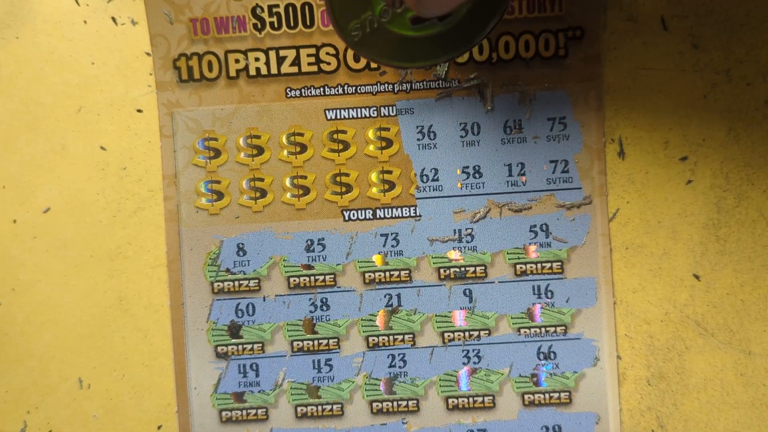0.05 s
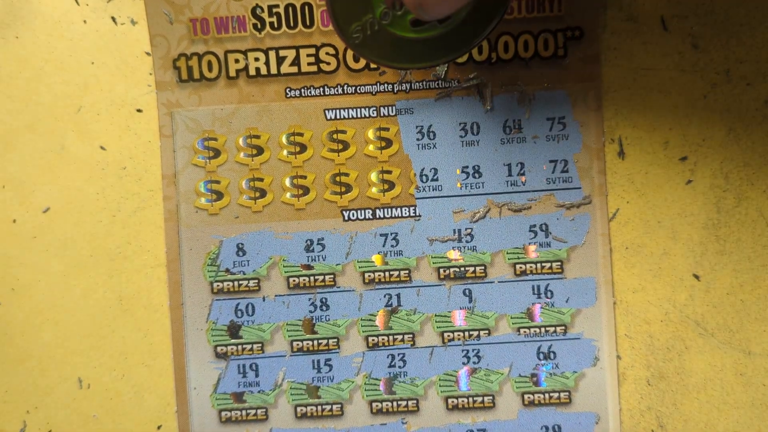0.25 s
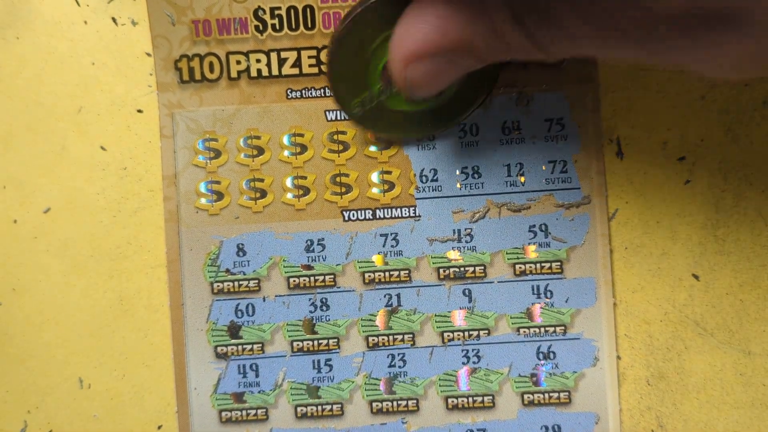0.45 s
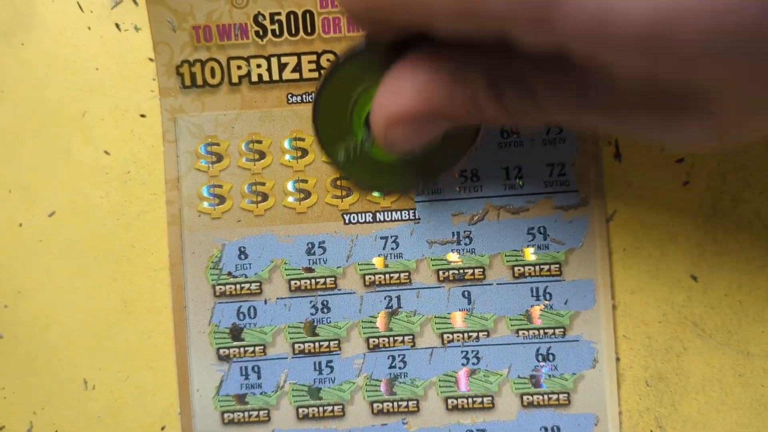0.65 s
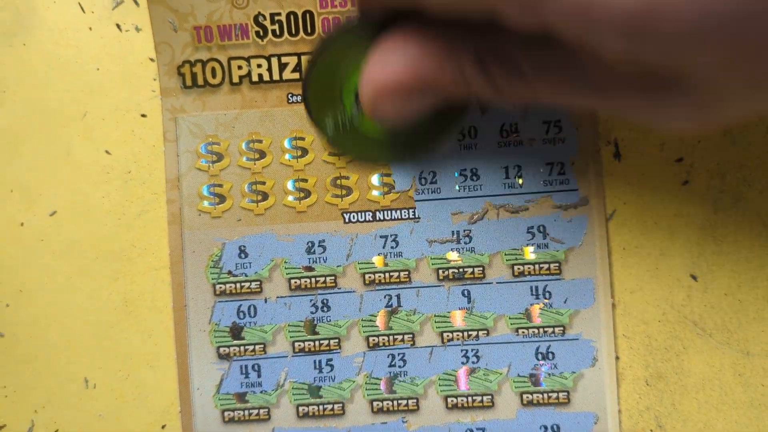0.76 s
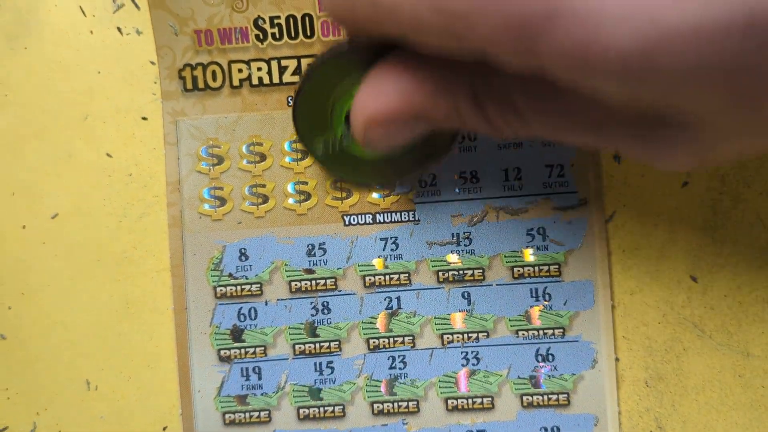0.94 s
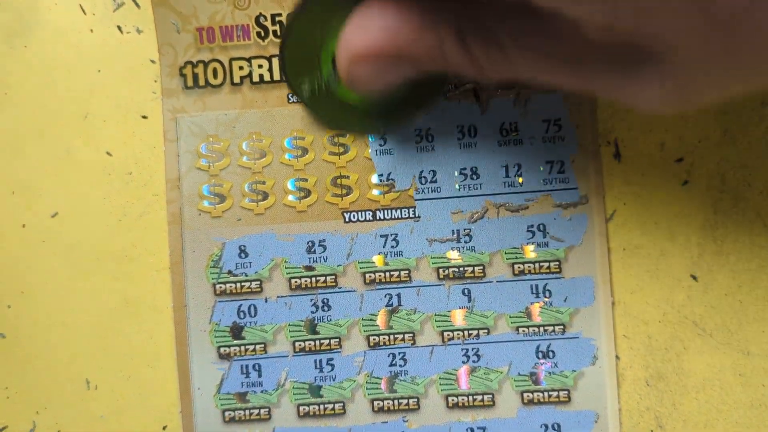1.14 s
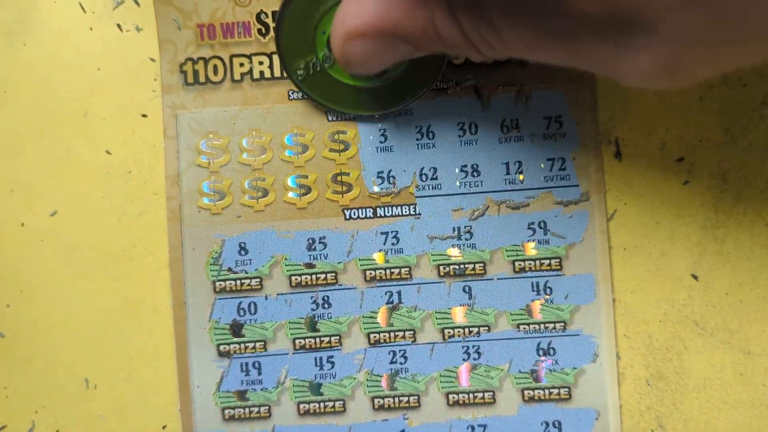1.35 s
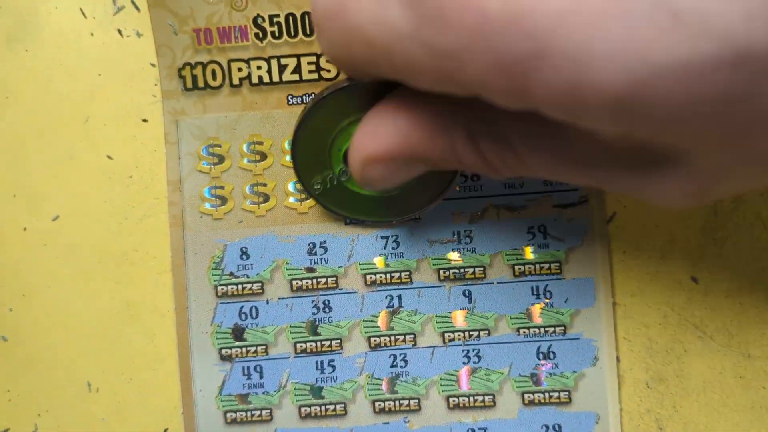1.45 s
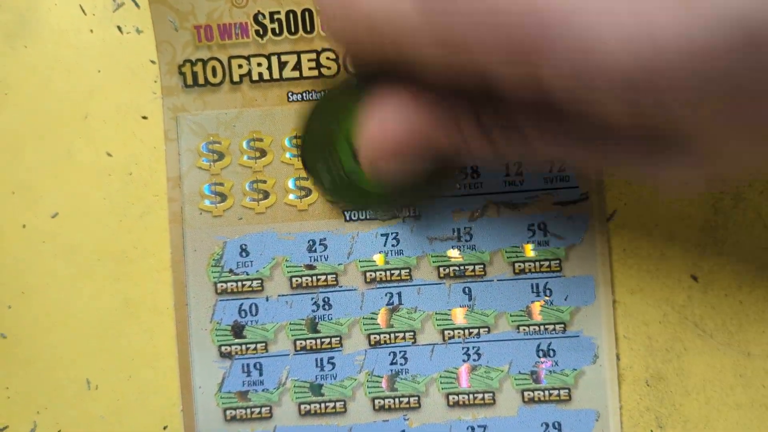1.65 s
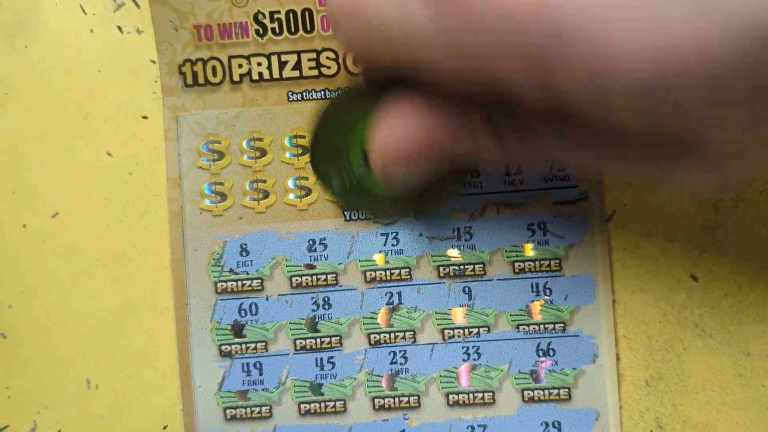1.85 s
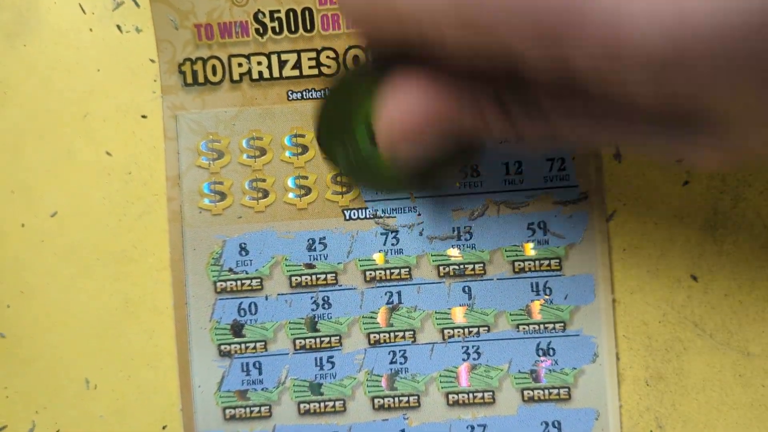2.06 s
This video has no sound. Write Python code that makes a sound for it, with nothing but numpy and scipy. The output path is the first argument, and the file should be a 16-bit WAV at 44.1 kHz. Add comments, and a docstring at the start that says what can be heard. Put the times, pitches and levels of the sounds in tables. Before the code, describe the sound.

Rapid dry scratching of a hard plastic rim on a paper ticket, with small table thuds

```python
"""Scratching a paper ticket

On a table indoors, close to the left microphone, a plastic disc scrapes the coating off a paper ticket.
It touches down, slides lightly, then rubs to and fro about seven times a second. Tiny grains of coating
break and ring the disc; the table judders late in each stroke and thuds where the disc bumps it, and the
rim ticks as it lands again. Short echoes, rumble, a wavering hum and faint hiss lie around it."""
import sys
import numpy as np
from scipy import signal
from scipy.fft import rfft, irfft
from scipy.io import wavfile

SR = 44100
rng = np.random.default_rng(int(sys.argv[2]) if len(sys.argv) > 2 else 0)


def int16_out(signal):
    """Quantize to a 16-bit WAV file."""
    q = np.round(np.clip(np.atleast_2d(signal).T, -1, 1) * 32767)
    wavfile.write(sys.argv[1], SR, q.astype(np.int16))


N = 92565


def amp(db):
    """Turns decibels into a pressure ratio."""
    return 10 ** (np.asarray(db) / 20)


def unit(x):
    """Scales to rms 1."""
    return x / np.sqrt(np.mean(x ** 2) + 1e-20)


def read(points, hz):
    """Reads a table on a log-frequency axis."""
    f, value = np.transpose(points)
    return np.interp(np.log(hz + 1), np.log(f + 1), value)


def through(x, response):
    """Sends a signal through an impulse response."""
    return signal.fftconvolve(x, response)[:N]


def shaped(x, gain):
    """Filters x by a gain that is a function of frequency."""
    hz = np.fft.rfftfreq(2 * N, 1 / SR)
    return irfft(rfft(x, 2 * N) * gain(hz))[:N]


def wander(hz):
    """Smooth random signal of rms 1, mostly slower than the given rate."""
    return unit(shaped(rng.standard_normal(N), lambda f: 1 / (1 + (f / hz) ** 4)))


MIN_WIDTH_HZ = 70  # narrower resonances are widened to this


def body(colour, modes=(), size=4096):
    """Minimum-phase impulse response of a broad colour with resonances on it."""
    hz = np.fft.rfftfreq(size, 1 / SR)
    db = read(colour, hz)
    for f, width, lift in modes:
        db = db + lift / (1 + (2 * (hz - f) / max(width, MIN_WIDTH_HZ)) ** 2)
    log_gain = np.log(amp(np.r_[db, db[-2:0:-1]]))
    # the Hilbert transform gives the phase that makes the response causal
    return np.fft.ifft(np.exp(np.conj(signal.hilbert(log_gain)))).real


def arch(start, length, peak, power):
    """Strength over one stroke: zero at both ends, 1 at the peak, as the rim speeds up and slows."""
    u = (np.arange(N) / SR - start) / length
    phase = np.interp(u, [0, np.clip(peak, 0.02, 0.98), 1], [0, 0.5, 1])
    return abs(np.sin(np.pi * phase)) ** power


def grains(per_s, spread_db):
    """Random snaps of uneven size and either sign, scaled to rms 1."""
    size = amp(spread_db * np.minimum(rng.exponential(1, N), 3.7))
    return unit(size * rng.choice([-1, 1], N) * (rng.random(N) < per_s / SR))


def strike(response, contact_ms):
    """One blow of peak 1; a longer contact spreads the force and dulls it."""
    u = np.arange(400) * 1000 / SR / max(contact_ms, 0.01)
    force = u ** 2 * np.exp(-u ** 2 / 3)
    blow = np.convolve(response, force)[:len(response)]
    return blow / abs(blow).max()


def add(mix, s, sound):
    """Lays a sound into the mix from the time s in seconds."""
    part = mix[max(round(s * SR), 0):][:len(sound)]
    part += sound[:len(part)]


def partner(x, other, likeness):
    """Blends x with an unrelated signal, by frequency, as a second microphone hears it."""
    def same(f):
        return np.clip(read(likeness, f), 0, 1)
    return shaped(x, same) + shaped(other, lambda f: np.sqrt(1 - same(f) ** 2))


# room rumble and microphone hiss, relative spectrum: (frequency [Hz], density [dB per Hz])
FLOOR = [(20, -35), (35, -25), (48, -8.5), (65, 0.5), (80, -8.5), (110, -4.5), (170, -16), (240, -11),
         (340, -26), (500, -33.5), (700, -42), (1200, -41), (2600, -45), (4800, -53), (6500, -48.5),
         (7800, -59), (11000, -58), (15700, -74)]
# likeness of that floor in the two microphones: (frequency [Hz], likeness [0-1])
FLOOR_SAME = [(50, .99), (300, 0.88), (1000, 0.17), (4000, 0.045)]
FLOOR_DB, HUM_HZ, HUM_DB = -50.5, 62, -54  # rms levels; the hum wavers around its pitch


def room_tone():
    """Shaped noise for low rumble and faint hiss, and a sine hum of unsteady pitch and level."""
    left, other = rng.standard_normal((2, N))
    pair = left, partner(left, other, FLOOR_SAME)
    air = np.array([unit(shaped(z, lambda f: amp(read(FLOOR, f)))) for z in pair])
    pitch_hz = HUM_HZ + 3 * wander(7.8)
    hum = np.sin(2 * np.pi * np.cumsum(pitch_hz) / SR) * (1 + 0.1 * wander(2))
    return amp(FLOOR_DB) * air + amp(HUM_DB) * unit(hum)


BUZZ_HZ, BUZZ_WIDTH_HZ, BUZZ_PER_S, BUZZ_DB = 6440, 750, 76, -85  # band, flutters per second, rms level


def buzz():
    """A very faint high hiss: a noise band whose level flutters quickly."""
    noise = rng.standard_normal(N)
    band = unit(shaped(noise, lambda f: np.exp(-((f - BUZZ_HZ) / BUZZ_WIDTH_HZ) ** 2)))
    flutter = np.sin(np.pi * BUZZ_PER_S * np.arange(N) / SR) ** 4
    return amp(BUZZ_DB) * unit(band * flutter)


# broad colour of disc and paper: (frequency [Hz], level [dB])
DISC = [(150, -32.5), (500, -26.5), (780, -23.5), (900, -18), (1050, -15), (1200, -12.5), (1400, -12),
        (1680, -11.5), (1780, -6), (1950, -1.5), (2900, -2), (3100, -10.5), (3300, -26), (4000, -14.5),
        (4700, -20), (5900, -17), (6600, -21.5), (7200, -25), (8000, -30.5), (9200, -34.5), (10300, -35.5),
        (12300, -42.5), (13200, -31.5), (14000, -62), (16000, -39)]
# resonances of the disc: (frequency [Hz], width [Hz], lift [dB])
MODES_OF_DISC = [(1190, 190, 11.5), (1523, 65, 7.5), (1870, 310, 3), (2500, 78, 3), (2673, 31, -8.5),
                 (2932, 360, 4.5), (3673, 140, 12.5), (4400, 390, 2), (5220, 89, 11.5)]
# high resonances of the disc: (frequency [Hz], width [Hz], lift [dB])
SHIMMER = [(10100, 700, 7), (12350, 600, 12)]


def disc_ring(pitch=1):
    """Ring of the disc on its paper, every frequency scaled by pitch."""
    colour = [(f * pitch, db) for f, db in DISC]
    modes = [(f * pitch, width, lift) for f, width, lift in MODES_OF_DISC + SHIMMER]
    return body(colour, modes)


# the rim lands: (time [s], peak level [dB], contact time scale [ms], crack peak level [dB])
TICKS = [(0.027, -45, 0.39, -65), (0.3953, -17, 0.12, -70), (0.471, -28.5, 0.11, -42),
         (0.493, -35, 0.063, -33.5), (0.6278, -25.5, 0.14, -41), (0.916, -22, 0.054, -30),
         (1.178, -31, 0.059, -35), (1.415, -36, 0.053, -46), (1.4268, -23, 0.053, -27),
         (1.651, -33, 0.063, -28), (1.8606, -23, 0.034, -22), (2.073, -20.5, .04, -21)]
# colour of the crack of a hard edge: (frequency [Hz], level [dB])
CRACK = [(300, -13), (2000, 4), (4000, 1), (6500, 1), (9000, -9), (11000, -24), (16000, -26)]


def ticks():
    """The rim taps the ticket and rings the disc; a hard edge adds a crack."""
    out, disc, crack = np.zeros(N), disc_ring(), body(CRACK)
    for s, db, contact_ms, crack_db in TICKS:
        tap = amp(db) * strike(disc, contact_ms)
        add(out, s, tap + amp(crack_db) * crack / abs(crack).max())
    return out


# colour of the table top: (frequency [Hz], level [dB])
TABLE = [(30, -39), (80, 2), (130, 0), (330, -1.5), (440, -6.5), (680, -3), (800, -13.5), (1500, -33),
         (4000, -78), (16000, -98)]
# resonances of the table top: (frequency [Hz], width [Hz], lift [dB])
MODES_OF_TABLE = [(256.4, 57, 3.6), (362, 78, 5.8), (596.4, 160, 8)]


def table_top():
    """Ring of the table top: its broad colour with resonances."""
    return body(TABLE, MODES_OF_TABLE)


# the disc bumps the table: (time [s], peak level [dB], contact time scale [ms])
KNOCKS = [(0.028, -48.5, 0.61), (0.3944, -42, 0.14), (0.471, -42.5, 0.62), (0.492, -40.5, 0.37),
          (0.73, -31.5, 0.14), (1.001, -22, 0.22), (1.021, -34, .6), (1.2615, -22, 0.52),
          (1.2725, -18.5, .5), (1.378, -28, 0.26), (1.734, -25, 0.22), (1.837, -29, 0.57),
          (1.9345, -24.5, 0.74), (1.939, -29, 0.36), (1.966, -28.5, 0.24), (2.083, -30.5, 0.49)]
KNOCK_LOW_HZ = 170  # the stiff table gives little deep bass


def knocks():
    """The table thuds where the disc bumps it, with the deep bass thinned."""
    out = np.zeros(N)
    thud = signal.lfilter(*signal.butter(1, KNOCK_LOW_HZ, "high", fs=SR), table_top())
    for s, db, contact_ms in KNOCKS:
        add(out, s, amp(db) * strike(thud, contact_ms))
    return out


# Scrape levels in these three tables are before SCRAPE_DB; low rasp and fizz also take DULL_DB and FIZZ_DB.
# strokes of the rim: (start [s], length [s], place of the peak [0-1], level [dB],
# extra low rasp [dB], extra fizz [dB], table judder level [dB])
STROKES = [(0.389, 0.19, 0.36, -49.5, 8, 3, -64.5), (0.602, 0.055, 1, -49, 7, 3, -59),
           (0.65, 0.098, 0.26, -24, 0.5, 1, -36.5), (0.781, 0.095, 0.4, -20, 0.5, 1.5, -39.5),
           (0.928, 0.11, 0.26, -22, -1, 1, -33), (1.063, 0.09, 0.52, -20.5, 1.5, 0.5, -41.5),
           (1.179, 0.11, 0.47, -20.5, -2.5, 0, -36), (1.312, 0.066, 0.47, -21, -0.5, 2.5, -43),
           (1.368, 0.03, 0.13, -22.5, 5.5, 0.5, -43), (1.426, 0.06, 0.5, -23, -6, -1.5, -43),
           (1.477, 0.046, 0.38, -18.5, -1, 1, -37), (1.544, 0.09, 0.33, -20, -5, 4, -43),
           (1.602, 0.024, 0.49, -20.5, -8, -1.5, -50), (1.653, 0.066, 0.51, -26.5, -10, -2, -45.5),
           (1.703, 0.04, 0.54, -20, -3.5, 0.5, -33.5), (1.757, 0.046, 1, -33, 7, 5.5, -39.5),
           (1.789, 0.069, 0.36, -30.5, 2.5, 4, -50.5), (1.846, 0.087, 0.59, -30.5, 4, 0.5, -44),
           (1.905, 0.049, 0.44, -25.5, 2, 1.5, -33.5), (1.971, 0.04, 0.65, -19, 2.5, 0.5, -36.5),
           (1.998, 0.059, 0.76, -25, -2, 1.5, -46), (2.059, 0.084, 0.51, -37, 10, 3, -53)]
# the rim grazes the paper between strokes: (start [s], length [s], level [dB])
GRAZES = [(0.29, 0.19, -62), (0.558, 0.052, -60), (0.88, 0.068, -62), (0.904, 0.038, -49),
          (1.044, 0.023, -54), (1.157, 0.02, -55.5), (1.292, 0.058, -48.5), (1.391, 0.06, -54),
          (1.524, 0.062, -58), (1.621, 0.046, -50), (1.727, 0.033, -47), (1.931, 0.038, -51),
          (2.047, 0.032, -45.5)]
# the rim bites into a thicker patch of coating: (start [s], length [s], level [dB])
SNAGS = [(1.106, 0.0068, -22), (1.226, 0.013, -34), (1.338, 0.019, -24), (1.554, 0.015, -19.5),
         (1.604, 0.0084, -26), (1.668, 0.0047, -26.5), (1.682, 0.0096, -23.5), (1.711, 0.0091, -21),
         (1.776, 0.016, -22.5), (1.829, 0.013, -24.5), (1.913, 0.0069, -18.5)]
# likeness of the grains in the two microphones: (frequency [Hz], likeness [0-1])
SAME = [(100, 0.8), (1200, 0.41), (2200, 0.98), (3000, 0.46), (5000, 0.4), (16000, 0.41)]
ARCH, SCRAPE_DB = 1.506, 1  # exponent of the stroke's rise and fall, level of the whole scrape
GRAINS_PER_S, GRAIN_SPREAD_DB = 9000, 2.5
CATCH_DB, CATCH_HZ = 1.5, 201  # the rim catches and slips unevenly
DULL_HZ, DULL_LAG_S, DULL_DB = 1480, 0.0027, -1.5  # the lower rasp comes later, as the rim slows
FIZZ_HZ, FIZZ_DB, FIZZ_CLUMP_DB, FIZZ_CLUMP_HZ = 3600, -2, 1.5, 91  # the fizz comes in clumps
DRIFT, DRIFT_HZ, DRIFT_POWER = 0.029, 3.6, 0.39  # detuning as share of pitch, rate, rms share of the force


def scrape():
    """Grains of coating break under the rim and ring the disc; the microphones hear partly different sets."""
    power, low_power, fizz_power = np.zeros((3, N))
    for start, length, peak, db, low_db, fizz_db, _ in STROKES:
        stroke = (amp(db) * arch(start, length, peak, ARCH)) ** 2
        power += stroke
        low_power += stroke * amp(low_db) ** 2
        fizz_power += stroke * amp(fizz_db + FIZZ_DB) ** 2
    brief = sum((amp(db) * arch(start, length, 0.67, 1)) ** 2 for start, length, db in SNAGS + GRAZES)

    t = np.arange(N) / SR
    rasp = np.sqrt(power + brief)
    dull = amp(DULL_DB) * np.sqrt(np.interp(t - DULL_LAG_S, t, low_power) + brief)
    fizz = np.sqrt(fizz_power + brief) * unit(amp(FIZZ_CLUMP_DB * wander(FIZZ_CLUMP_HZ)))
    catch = unit(amp(CATCH_DB * wander(CATCH_HZ)))

    # the changing grip crossfades the disc towards a higher or a lower tuning
    grip = np.clip(DRIFT_POWER * wander(DRIFT_HZ), -1, 1)
    rings = [(disc_ring(), 1 - abs(grip)),
             (disc_ring(1 + DRIFT), np.maximum(grip, 0)),
             (disc_ring(1 - DRIFT), np.maximum(-grip, 0))]

    near = grains(GRAINS_PER_S, GRAIN_SPREAD_DB)
    other = grains(GRAINS_PER_S, GRAIN_SPREAD_DB)
    out = []
    for snaps in near, partner(near, other, SAME):
        low = shaped(snaps, lambda f: 1 / (1 + (f / DULL_HZ) ** 8))
        coarse = shaped(snaps, lambda f: 1 / (1 + (f / FIZZ_HZ) ** 8))
        force = catch * (low * dull + (coarse - low) * rasp + (snaps - coarse) * fizz)
        out.append(sum(through(force * share, ring / np.linalg.norm(ring)) for ring, share in rings))
    return amp(SCRAPE_DB) * np.array(out)


JUDDERS_PER_S, JUDDER_SPREAD_DB = 980, 3.5
JUDDER_ARCH, JUDDER_PEAK, JUDDER_OVERRUN_S = 0.67, 0.67, 0.0027  # exponent, place of the peak, extra length


def judder():
    """The table judders as the disc slows: random pushes, strongest late in each stroke, ring its top."""
    power = np.zeros(N)
    for start, length, *_, db in STROKES:
        power += (amp(db) * arch(start, length + JUDDER_OVERRUN_S, JUDDER_PEAK, JUDDER_ARCH)) ** 2
    pushes = np.sqrt(power) * grains(JUDDERS_PER_S, JUDDER_SPREAD_DB)
    top = table_top()
    return through(pushes, top / np.linalg.norm(top))


# the right microphone is shaded: (frequency [Hz], level against the left [dB])
SHADE = [(100, -6), (330, 0), (520, -8.5), (850, -7), (1200, -13.5), (1600, -5), (1950, -13), (2300, -12),
         (2900, -24.5), (3350, 8), (3750, -16), (4400, 0), (5100, -17.5), (6500, -9), (8000, -6.5),
         (9500, -1.5), (16000, -1.5)]
LAG_S = 0.0002


def far_microphone(x):
    """The shaded right microphone: coloured by frequency and slightly late."""
    return shaped(through(x, body(SHADE)), lambda f: np.exp(-2j * np.pi * f * LAG_S))


def echoes(x, t60):
    """Dense random reflections after the first millisecond, dying by 60 dB in t60 seconds."""
    t = np.arange(SR // 2) / SR
    tail = rng.standard_normal(len(t)) * amp(-60 * t / t60) * (t > 0.001)
    return through(x, tail / np.linalg.norm(tail))


ECHO_DB, ECHO_T60, ROOM_DB, ROOM_T60 = -10, 0.0075, -32.5, 0.14  # levels, decay times in s


def with_room(x):
    """Adds very short close echoes and the longer, fainter room."""
    return x + amp(ECHO_DB) * echoes(x, ECHO_T60) + amp(ROOM_DB) * echoes(x, ROOM_T60)


def scene():
    """Disc and table at both microphones, with echoes, over the room tone and the faint buzz."""
    left, right = ticks() + knocks() + scrape() + judder()
    right = far_microphone(right)
    return np.array([with_room(left), with_room(right)]) + room_tone() + buzz()


EDGE_HZ = 15800


def record(dry):
    """The recorder's band limit: a steep low-pass."""
    lowpass = signal.firwin(511, EDGE_HZ, window=("kaiser", 9), fs=SR)
    return signal.oaconvolve(dry, lowpass[None], "same")


dry = scene()
out = record(dry)
int16_out(out)
```